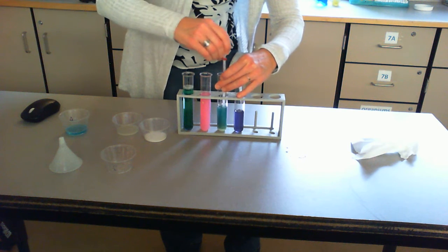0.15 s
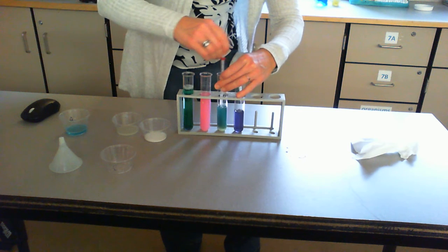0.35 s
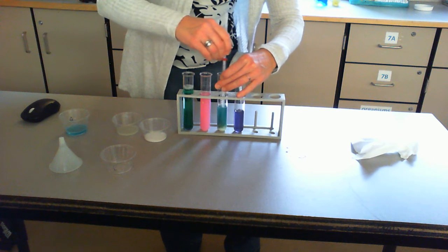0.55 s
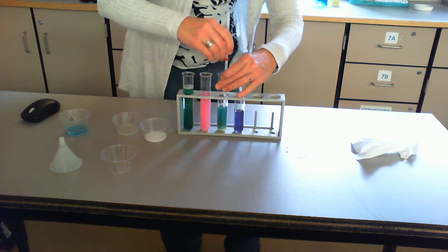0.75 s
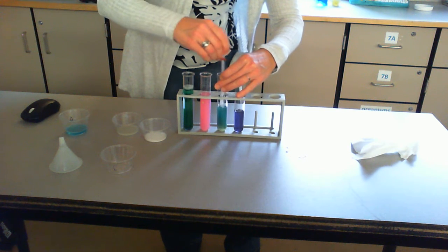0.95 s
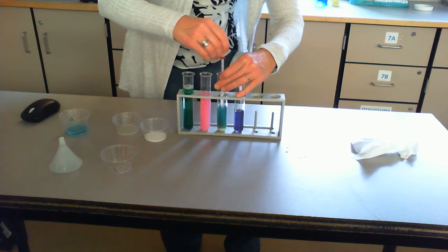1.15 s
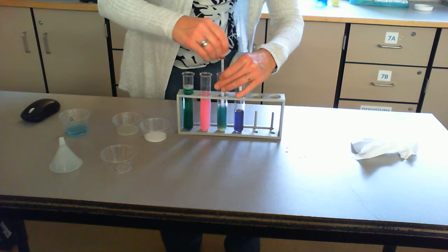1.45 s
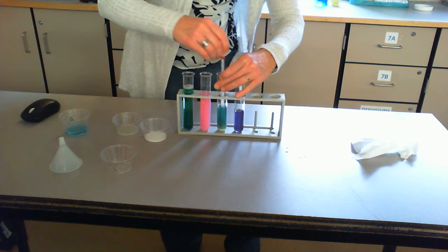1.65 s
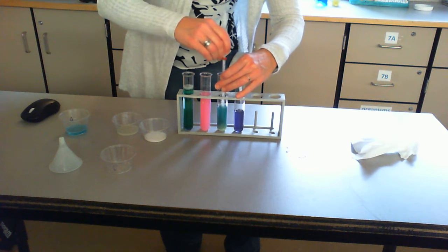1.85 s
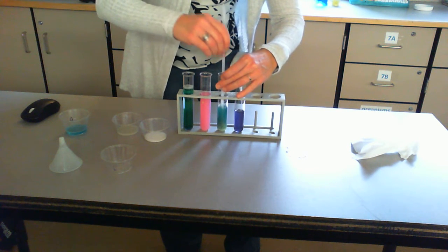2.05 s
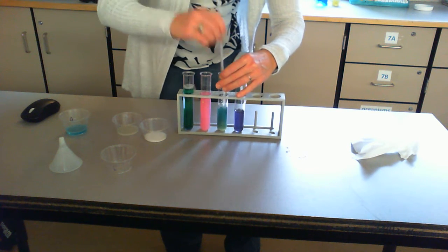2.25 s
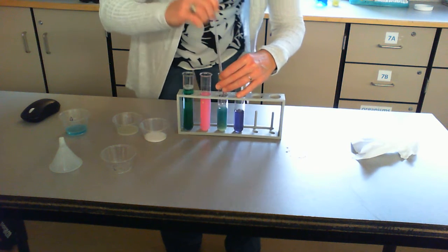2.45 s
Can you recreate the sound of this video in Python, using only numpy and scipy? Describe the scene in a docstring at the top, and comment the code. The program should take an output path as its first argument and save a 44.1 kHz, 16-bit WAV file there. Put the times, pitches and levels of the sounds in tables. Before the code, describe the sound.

A glass thermometer stirred in a glass test tube, clinking sharply and scraping in a quiet classroom

```python
"""Impact and friction of glass in a test tube

A glass thermometer is stirred in a test tube standing in a rack on a classroom table. Knocks excite
damped modes of the glass and leave a brief chatter; scrapes are dense contacts heard through resonances.
From 2 s the thermometer sits higher and the glass rings differently. The rack rattles in its modes and
hums under the hand in single rough notes. Room reverberation follows the glass; mains hum and air lie beneath.
"""
import sys
import numpy as np
from scipy import signal
from scipy.fft import rfft, irfft, next_fast_len
from scipy.io import wavfile
from scipy.ndimage import uniform_filter1d

SR = 44100
rng = np.random.default_rng(int(sys.argv[2]) if len(sys.argv) > 2 else 0)


def nominal_scale(level):
    """Amplitude ratio for a level in decibels (scalar or array-like)."""
    x = np.asarray(level, float) / 20
    return 10 ** x


def dump(signal):
    """Clip the signal to [-1, 1] and save it as 16-bit WAV at the path in sys.argv[1]."""
    limited = np.clip(np.atleast_2d(signal).T, -1, 1)
    pcm = np.round(limited * 32767).astype(np.int16)
    wavfile.write(sys.argv[1], SR, pcm)


N = 114660  # samples
LIFT_S = 2.0  # from here the thermometer sits higher

# Mains hum partials: (frequency [Hz], level [dB rms])
HUM = [(59, -69), (120, -73), (177, -72.5), (238, -78.5), (295, -72)]
# Spectral shape of the room air: (frequency [Hz], relative density [dB per Hz])
AIR_SPECTRUM = [(30, -3.5), (135, -5), (521, -5), (1180, -16), (1320, -27), (2730, -29.5), (6350, -28.5),
                (7100, -24.5), (15200, -24), (16500, -56)]
# Slides along the glass: (start [s], held length [s], rms level before its envelope [dB],
# brightness about 6 kHz [dB per octave])
SCRAPES = [(.01, 0.012, -53, 0), (0.033, 0.048, -49, 1), (0.255, 0.054, -64.5, -2), (0.312, 0.05, -48.5, 2),
           (0.402, 0.041, -50, -1.5), (0.497, 0.015, -47.5, -10), (0.616, 0.11, -60.5, -10.5),
           (0.664, 0.058, -48.5, -3), (0.806, 0.041, -47, -3.5), (0.876, 0.077, -49, -1),
           (0.93, 0.027, -49.5, -10), (0.977, 0.041, -54.5, -6), (1.069, 0.018, -55.5, -6.5),
           (1.129, 0.051, -52, -0.5), (1.184, 0.064, -51.5, -1), (1.377, 0.071, -57.5, .1),
           (1.419, 0.15, -60, 2.5), (1.562, 0.038, -47, -5.5), (1.666, 0.063, -46.5, 0.5),
           (1.843, 0.036, -46.5, -1.5), (1.936, 0.04, -46, 1), (2.108, 0.06, -53, -1.5),
           (2.15, 0.056, -56.5, -13), (2.22, 0.022, -51, -9), (2.337, 0.026, -50.5, 4),
           (2.385, 0.036, -45.5, 7.5), (2.484, 0.019, -53.5, 0)]
# Resonances of the rubbed glass: (frequency [Hz], width [Hz], relative level [dB])
RUBBED_GLASS = [(2868, 70, -0.5), (3245, 28, -4), (3880, 62, -8.5), (4673, 86, 4), (5670, 120, 1),
                (6610, 310, -6.5), (7060, 270, -8.5), (7630, 340, -1.5), (9050, 500, -7.5), (9960, 520, -5),
                (12100, 990, -17), (13300, 1000, -16)]
# Modes of the rack, before scatter: (frequency [Hz], relative level [dB])
RACK_MODES = [(420, -3.5), (560, -4), (760, 1.5), (950, -1.5), (1180, -2), (1390, -7), (1650, -14),
              (2050, -10.5), (2480, 0.5)]
# Jolts of the rack: (start [s], frequency [Hz], rms level before its envelope [dB], held length [s])
JOLTS = [(0.011, 893, -47, 0.063), (0.018, 338.5, -55, 0.057), (0.148, 788, -51, 0.019),
         (0.217, 731.6, -43.5, 0.019), (0.236, 634.5, -55, 0.064), (0.49, 825, -58, 0.058),
         (0.628, 996, -61, 0.075), (0.672, 773, -49, 0.017), (0.695, 982, -52, 0.021),
         (.70, 1194, -55, 0.024), (0.686, 345.5, -53.5, 0.052), (0.818, 857, -59.5, 0.079),
         (1.076, 825, -54.5, 0.02), (1.077, 124, -53.5, 0.047), (1.237, 753, -56.5, 0.015),
         (1.33, 772, -54.5, 0.11), (1.342, 349.6, -53.5, 0.043), (1.427, 350.5, -55.5, 0.034),
         (1.505, 930, -54.5, 0.019), (1.581, 1367, -55, 0.022), (1.638, 1640, -64.5, 0.031),
         (1.746, 385.6, -47.5, 0.029), (1.886, 931, -57, 0.084), (2.037, 1260, -47.5, 0.016),
         (2.081, 486, -53.5, 0.033), (2.319, 346.3, -38.5, 0.031), (2.311, 754, -43.5, 0.054),
         (2.307, 1098, -47.5, 0.034), (2.308, 2038, -47, 0.03)]
# Reverberation of the classroom: (frequency [Hz], time to fall 60 dB [s])
ROOM_DECAY = [(300, 0.28), (2000, 0.19), (10000, 0.12)]
# Knocks on the tube wall: (time [s], clink peak before the radiation filter [dB],
# chatter against that peak [dB], brightness about 6 kHz [dB per octave])
KNOCKS = [(0.1461, -14, -22, -6), (0.2178, -23.5, -35, -6), (0.2238, -8, -20, -4.5), (0.38, -14, -21, -3),
          (0.668, -37, -40, -6), (0.7045, -7.5, -25.5, -2), (0.941, -33, -13.5, -8.5),
          (0.9797, -38, -21, 10), (1.0092, -36, -21, -4), (1.074, -35.5, -23, 1), (1.24, -22, -23.5, -6.5),
          (1.3309, -23.5, -28, -2.5), (1.3356, -9.5, -22, -3.5), (1.4265, -39, -17, 2),
          (1.44, -34.5, -35, -1), (1.4803, -40, -17, 0), (1.5069, -6, -21.5, -5), (1.5838, -29, -16.5, -8),
          (1.6739, -34.5, -18, -5), (1.692, -38.5, -24, -6), (1.7222, -16.5, -27, 21),
          (1.7402, -7, -25.5, -4), (1.8514, -28, -37, -4), (1.8626, -26, -43, -3),
          (1.936, -25.5, -18, -8.5), (2.041, -1, -30.5, -5.5), (2.072, -6.5, -24.5, -2),
          (2.0763, -10, -26, -10), (2.2327, -41, -29.5, -14.5), (2.2907, -20, -14.5, 4),
          (2.296, -21, -13.5, 7), (2.3105, 0, -26, -4), (2.3871, -23, -9, 6), (2.4908, -24, -16.5, -6)]
# Glass modes, thermometer deep, before scatter: (frequency [Hz], nominal width [Hz], relative level [dB])
DEEP_GLASS = [(2640, 450, -15.5), (3270, 1100, -13), (3628, 290, -10.5), (4620, 720, -12),
              (5567, 580, -8.5), (6630, 390, -6), (7040, 170, 2), (8270, 420, -1.5), (9140, 275, 3.5),
              (11230, 2500, -6), (12070, 370, -14), (13800, 900, -23)]
# Glass modes, thermometer raised, before scatter: (frequency [Hz], nominal width [Hz], relative level [dB])
LIFTED_GLASS = [(1193, 160, -13), (3530, 290, 1), (4130, 360, -4), (4770, 730, -7), (5300, 90, -24.5),
                (5520, 1100, 0), (6530, 620, 1.5), (7215, 160, 8.5), (8030, 48, 6.5), (8970, 510, 5.5),
                (10260, 250, 6), (10900, 190, -3), (12200, 800, -3.5)]
# Free ringing of the raised thermometer: (frequency [Hz], level against the chatter [dB])
FREE_RING = [(3550, -19), (5680, -7.5)]


def unit(x):
    """Normalisation: scales a signal to rms 1."""
    return x / np.sqrt(np.mean(np.abs(x) ** 2) + 1e-20)


def along(points, hz):
    """Logarithmic frequency scale: interpolates (frequency [Hz], value) points."""
    f, v = np.transpose(points)
    return np.interp(np.log(hz + 1), np.log(f + 1), v)


def filtered(x, response):
    """Convolution theorem: multiplies the spectrum of x by a complex response of frequency."""
    m = next_fast_len(len(x) + 8192)
    return irfft(rfft(x, m) * response(np.fft.rfftfreq(m, 1 / SR)), m)[:len(x)]


def resonances(table):
    """Modal superposition: sums causal second-order resonances of alternating sign."""
    def response(f):
        total = 0
        for k, (centre, width, db) in enumerate(table):
            mode = 1j * f * width / (centre * centre - f * f + 1j * f * width)
            total = total + (-1) ** k * nominal_scale(db) * mode
        return total
    return response


def envelope(t, rise_s, hold_s, t60_s):
    """Exponential transients: a rise with time constant rise_s, a hold, a 60 dB fall in t60_s."""
    return (1 - np.exp(-t / rise_s)) * nominal_scale(-60 * np.maximum(t - hold_s, 0) / t60_s)


def contacts(length, rate, spread_db):
    """Random point process: tiny contacts, rate per second, of very uneven size."""
    occurs = rng.random(length) < rate / SR
    size_db = spread_db * np.minimum(rng.exponential(size=length), 4)
    return occurs * rng.standard_normal(length) * nominal_scale(size_db)


def patchy(x, depth_db):
    """Spectro-temporal modulation: random gain patches of rms depth_db, then rms 1."""
    z = signal.stft(x, nperseg=256)[2]
    field = uniform_filter1d(rng.standard_normal(z.shape), 3, 0)
    field = uniform_filter1d(field, 8, 1)
    return unit(signal.istft(z * nominal_scale(depth_db * unit(field)), nperseg=256)[1][:len(x)])


def floor():
    """Stationary background: filtered noise for the air, partials with wandering phase for the hum."""
    air_db = -61  # rms
    t = np.arange(N) / SR
    hum = 0
    for hz, db in HUM:
        drift = np.cumsum(rng.standard_normal(N)) * 0.0034  # radians
        hum = hum + np.sqrt(2) * nominal_scale(db) * np.sin(2 * np.pi * hz * t + drift)
    air = filtered(rng.standard_normal(N), lambda f: nominal_scale(along(AIR_SPECTRUM, f)))
    return hum + nominal_scale(air_db) * patchy(air, depth_db=3.5)


def rack_rattle(length, depth_db):
    """Modal excitation: noise shakes the rack's modes, each time in another mix."""
    width_hz, scatter_db = 91, 4
    hz, db = np.transpose(RACK_MODES)
    db = db + scatter_db * rng.standard_normal(len(hz))
    modes = np.c_[hz, width_hz + 0 * hz, db]
    return patchy(filtered(rng.standard_normal(length), resonances(modes)), depth_db)


def scrape():
    """Stick-slip friction: dense contacts, in bursts, drive the glass resonances and rattle the rack."""
    contact_rate, contact_spread_db, patch_db = 5400, 1.6, 3.5  # rate in contacts a second
    slip_s, slip_db = 0.0049, 1.5  # smoothing length and rms depth of the stick-slip bursts
    rattle_db = -16  # against the rub
    out, t = np.zeros((2, N + SR)), np.arange(SR // 5) / SR
    for s, length, level_db, tilt in SCRAPES:
        # raised: the lowest mode is gone
        hz, width, db = np.transpose(RUBBED_GLASS if s < LIFT_S else RUBBED_GLASS[1:])
        db = db + tilt * np.log2(hz / 6000) + 3 * rng.standard_normal(len(hz))
        bursts = uniform_filter1d(rng.standard_normal(len(t)), round(slip_s * SR))
        force = nominal_scale(slip_db * unit(bursts)) * contacts(len(t), contact_rate, contact_spread_db)
        rub = patchy(filtered(force, resonances(np.c_[hz, width, db])), patch_db)
        rattle = nominal_scale(rattle_db) * rack_rattle(len(t), depth_db=4)
        swell = nominal_scale(level_db) * envelope(t, rise_s=0.00084, hold_s=length, t60_s=0.076)
        out[:, round(s * SR):][:, :len(t)] += swell * np.array([rub, rattle])
    return out[:, :N]


def rack_hum():
    """Narrow-band resonance: each jolt swells one note of the rack, roughened by complex noise."""
    roughness, rough_cycles = 1, 6.5  # rms against the steady note; smoothing in cycles of the note
    out, t = np.zeros(N + SR), np.arange(SR // 4) / SR
    for s, hz, db, length in JOLTS:
        shiver = uniform_filter1d(rng.standard_normal((2, len(t))), round(rough_cycles * SR / hz))
        modulation = 1 + roughness * unit(shiver[0] + 1j * shiver[1])
        note = (modulation * np.exp(2j * np.pi * hz * t)).imag
        note = note / np.std(note[:round(length * SR)])
        swell = envelope(t, rise_s=0.0062, hold_s=length, t60_s=0.097)
        out[round(s * SR):][:len(t)] += nominal_scale(db) * swell * note
    return out[:N]


def room(x):
    """Reverberation: convolution with noise whose every frequency decays at its own speed."""
    hz, t, z = signal.stft(rng.standard_normal(SR // 2), SR, nperseg=256)
    decay = nominal_scale(-60 * t / along(ROOM_DECAY, hz)[:, None])
    tail = signal.istft(z * decay, SR, nperseg=256)[1]
    delayed = np.pad(x, (300, 0))  # samples
    return signal.fftconvolve(delayed, tail / np.linalg.norm(tail))[:N]


def clink(t, hz, db):
    """Impact excitation: a cluster of contacts sets off damped glass modes and a noise crack; peak 1."""
    t60_s, treble_damping = 0.0082, 0.2  # decay at 6 kHz; power of its fall with pitch
    crack_db, cluster_s = -20, 0.0025
    phase = 2.3 * rng.standard_normal((len(hz), 1))
    tones = np.sin(2 * np.pi * hz[:, None] * t + phase)
    tones = tones * nominal_scale(-60 * t / (t60_s * (6000 / hz[:, None]) ** treble_damping))
    onset = (1 - np.exp(-t / 0.00038)) ** 2
    ringing = nominal_scale(db) @ tones / np.linalg.norm(nominal_scale(db)) * onset
    crack = nominal_scale(crack_db - 60 * t / 0.0016) * np.diff(rng.standard_normal(len(t) + 1)) / 2
    late = np.r_[0, rng.random(3)]  # the first contact is the hardest, a few follow
    strength = nominal_scale(-7 * (late > 0) - 9 * late)
    cluster = np.bincount((cluster_s * SR * late).astype(int), strength)
    sound = np.convolve(ringing + crack, cluster)[:len(t)]
    return sound / np.abs(sound).max()


def chatter(t, hz, width, db):
    """Repeated micro-impacts: a fading stream of contacts drives the glass resonances."""
    force = contacts(len(t), rate=11000, spread_db=3.5)
    sound = filtered(force, resonances(np.c_[hz, 0.9 * width, db]))
    fade = envelope(t, rise_s=0.0022, hold_s=0.0087, t60_s=0.059)
    return fade * patchy(sound, depth_db=3.5)


def free_ring(t):
    """Free vibration: two lightly damped partials of the raised thermometer, with wandering phase."""
    t60_s = 0.17
    ring = 0
    for hz, db in FREE_RING:
        wander = 0.11 * np.cumsum(rng.standard_normal(len(t)))  # radians
        ring = ring + nominal_scale(db - 60 * t / t60_s) * np.sin(2 * np.pi * hz * t + wander)
    return ring


def knocks():
    """Impact response: each knock gives a clink and chatter of the glass and a rattle of the rack."""
    pitch_scatter, level_scatter_db = 0.015, 2.5  # each knock lands elsewhere; pitch as a fraction
    rattle_db = -41.5  # against the clink's peak
    glass, rack, t = np.zeros(N + SR), np.zeros(N + SR), np.arange(SR // 6) / SR
    for s, peak_db, chatter_db, tilt in KNOCKS:
        hz, width, db = np.transpose(DEEP_GLASS if s < LIFT_S else LIFTED_GLASS)
        hz = hz * (1 + pitch_scatter * rng.standard_normal(len(hz)))
        db = db + tilt * np.log2(hz / 6000) + level_scatter_db * rng.standard_normal(len(hz))
        sound = clink(t, hz, db) + nominal_scale(chatter_db) * chatter(t, hz, width, db)
        if s > LIFT_S:
            sound = sound + nominal_scale(chatter_db) * free_ring(t)
        rattle = envelope(t, 0.0017, 0.018, 0.12) * rack_rattle(len(t), depth_db=4.5)
        start = round(s * SR)
        glass[start:][:len(t)] += nominal_scale(peak_db) * sound
        rack[start:][:len(t)] += nominal_scale(peak_db + rattle_db) * rattle
    return glass[:N], rack[:N]


def tube_radiation(glass):
    """Radiation efficiency: the small tube radiates little below its lowest mode (high-pass)."""
    def response(f):
        ratio = f / 2654  # Hz
        return ((1j * ratio) ** 2 / (1 + 1.2j * ratio - ratio ** 2)) ** 2
    return filtered(glass, response)


def scene():
    """Linear superposition: glass with its reverberation, rack and floor."""
    room_db = -19.5
    glass, rattle = np.array(knocks()) + scrape()
    glass = tube_radiation(glass)
    return (glass + nominal_scale(room_db) * room(glass) + rattle + rack_hum() + floor())[None]


def microphone(x):
    """Soft saturation and band limit: the hardest peaks are squashed, the top rolls off."""
    clip_top, top_hz = 0.83, 15030
    squashed = x / (1 + (x / clip_top) ** 4) ** (1 / 4)
    return filtered(squashed, lambda f: 1 / np.sqrt(1 + (f / top_hz) ** 40))


def band_limit(x):
    """A steep low-pass at the top of the band."""
    return signal.sosfilt(signal.butter(12, 16800, fs=SR, output="sos"), x)


def record(dry):
    """Transduction: the microphone turns the dry sound into the finished mix."""
    mix = microphone(dry[0])[None]
    return band_limit(mix)


dry = scene()
out = record(dry)
dump(out)
```